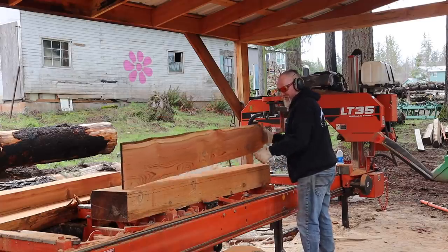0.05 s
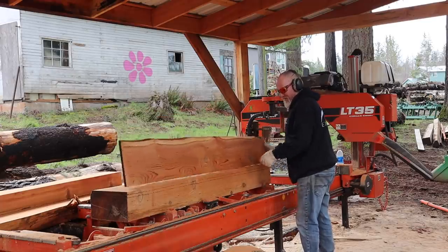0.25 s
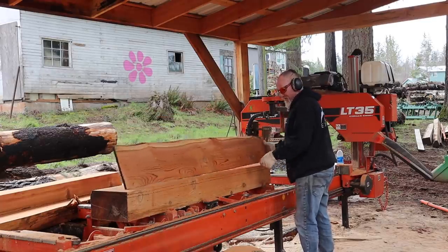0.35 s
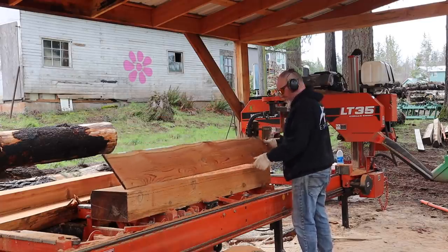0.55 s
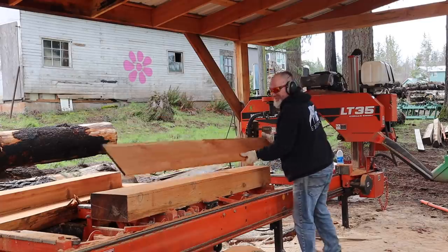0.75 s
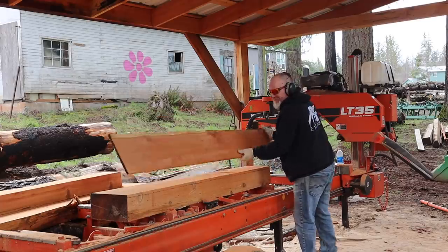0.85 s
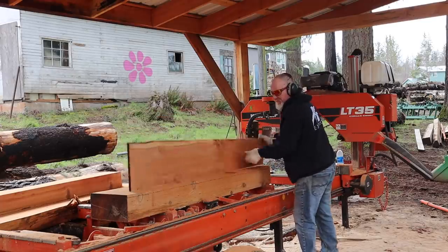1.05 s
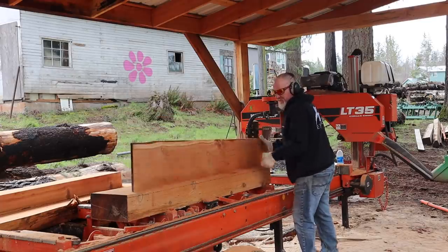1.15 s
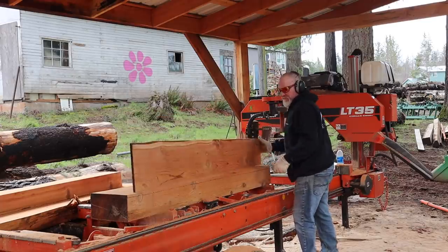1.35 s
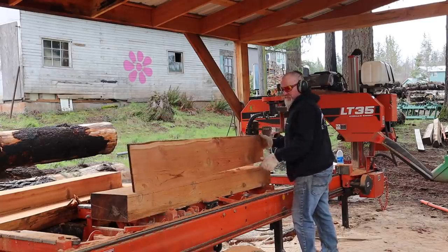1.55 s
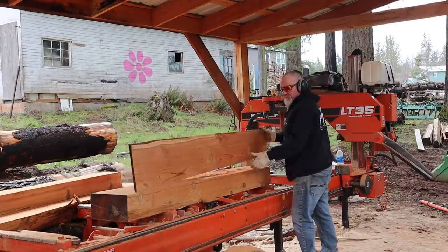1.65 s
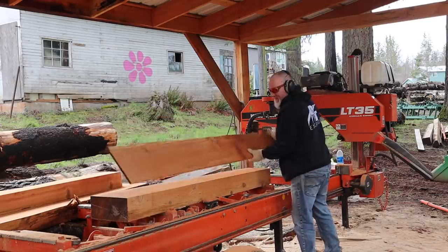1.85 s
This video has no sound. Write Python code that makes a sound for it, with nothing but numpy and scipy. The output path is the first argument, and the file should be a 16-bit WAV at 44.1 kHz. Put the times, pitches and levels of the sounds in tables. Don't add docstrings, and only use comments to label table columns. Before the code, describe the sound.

Wooden plank knocks on a sawmill bed: soft shifts at 0.1 s, a hard, full knock at 0.22 with bounces and thin steel ringing, a heavy dull thud at 0.36, faint nudges near 0.7. Wood grates around 1.05, then a sharper, shorter knock at 1.14, clinks and rattles to 1.35, low steel hum from 1.45. Dragging from 1.7 cuts at 1.83 to faint birds. Quiet yard air, distant motor, roof reverberation, clipped peaks.

```python
import sys
import numpy as np
from scipy import signal
from scipy.fft import rfft, irfft, next_fast_len
from scipy.io import wavfile
from scipy.ndimage import map_coordinates

SR = 44100
rng = np.random.default_rng(int(sys.argv[2]) if len(sys.argv) > 2 else 0)


def decibels_to_gain(level_db):
    exponent = np.asarray(level_db, float) / 20
    return 10 ** exponent


def int16_out(signal):
    q = np.round(np.clip(np.atleast_2d(signal).T, -1, 1) * 32767)
    wavfile.write(sys.argv[1], SR, q.astype(np.int16))


N = 83790
T = np.arange(N) / SR
CHANGE_S = 1.826
STEEL_RISE_S = 0.0014


def unit(x):
    return x / np.sqrt(np.mean(x ** 2) + 1e-20)


def along(points, hz):
    f, v = np.transpose(points)
    return np.interp(np.log(hz + 1), np.log(f + 1), v)


def curve(rows, outside_db=-120):
    s, db = np.transpose(rows)
    return np.interp(T, s, db, outside_db, outside_db)


def filtered(x, response):
    m = next_fast_len(len(x) + 8192)
    hz = np.fft.rfftfreq(m, 1 / SR)
    return irfft(rfft(x, m) * response(hz), m)[:len(x)]


def band(f, hz, width_hz):
    return 1j * f * width_hz / (hz * hz - f * f + 1j * f * width_hz + 1e-9)


def ring_noise(length, hz, width_hz):
    return filtered(rng.standard_normal(length), lambda f: band(f, hz, width_hz) ** 2)


def decaying_tone(t, hz, db, t60):
    return decibels_to_gain(db - 60 * t / t60) * np.sin(2 * np.pi * hz * t)


def add(out, s, x):
    part = out[round(s * SR):][:len(x)]
    part += x[:len(part)]


def wobble(rate):
    return map_coordinates(rng.standard_normal(int(N * rate / SR) + 4), [T * rate])


# frequency in Hz, t60 in seconds.
ROOF_DECAY = [(80, 1.27), (250, 0.41), (1000, 0.72), (3000, 0.58), (10000, 0.43)]


def roof():
    wall_s, wall_spread_s, wall_db, rise_s = 0.16, 0.021, 0, 0.00067
    hz, t, z = signal.stft(rng.standard_normal(SR), SR, nperseg=256)
    swell_db = wall_db * np.exp(-((t - wall_s) / wall_spread_s) ** 2)
    decay_db = -60 * t / along(ROOF_DECAY, hz)[:, None]
    tail = signal.istft(z * decibels_to_gain(swell_db + decay_db), SR, nperseg=256)[1][:SR]
    tail = tail * (1 - np.exp(-T[:SR] / rise_s))
    return tail / np.linalg.norm(tail)


# frequency in Hz, width in Hz, gain over the
# plain tail in dB.
FRAME = [(2620, 300, -6), (3400, 600, -2), (4870, 350, -4), (5480, 350, -3)]


def scatter(tone):
    def colour(f):
        frame = sum(decibels_to_gain(db) * np.abs(band(f, hz, w)) ** 2 for hz, w, db in FRAME)
        return decibels_to_gain(along(tone, f)) * (1.22 + frame)
    return filtered(roof(), colour)


def knocks(blows, modes, tone, sign=1):
    strike_s, crack_s, crack_hz, crack_width_hz = 0.00037, 0.0082, 2730, 2130
    scatter_db, ring_share_db = -1, -16
    out, t = np.zeros(N), T[:SR // 4]
    ring = sum((-1) ** k * decaying_tone(t, *mode) for k, mode in enumerate(modes))
    ring = sign * ring * (1 - np.exp(-(t / strike_s) ** 2))
    for s, ring_db, crack_db, roof_db in blows:
        splinter = rng.standard_normal(len(t)) * decibels_to_gain(-60 * t / crack_s)
        crack = filtered(splinter, lambda f: band(f, crack_hz, crack_width_hz) ** 2)
        add(out, s, decibels_to_gain(ring_db) * ring + decibels_to_gain(crack_db) * crack)
        broad = scatter(tone)
        broad = broad * np.linalg.norm(ring) / np.linalg.norm(broad)
        add(out, s, decibels_to_gain(ring_db + roof_db + scatter_db) * broad)
        add(out, s, decibels_to_gain(ring_db + roof_db + ring_share_db) * signal.fftconvolve(ring, roof()))
    return out


# frequency in Hz, level in dB, t60 in seconds.
END_MODES = [(114, -5, 0.11), (178, -4.5, 0.083), (292.6, -3, 0.055), (459, -4.5, 0.064), (638, 0.5, 0.041),
             (709, -3, 0.042), (883.5, 0.5, 0.061), (1060, -7, 0.012), (1382, -5, 0.042),
             (1559, -13.5, 0.035), (1800, -11, 0.031), (2240, -7, 0.0071), (2635, -23, 0.048)]
# start in seconds, ring in dB, crack in dB, roof in dB.
END_BLOWS = [
    (.2218, -23.5, -61, -6.5),
    (.2243, -17, -21.5, -3),
    (.2284, -27.5, -44, 1),
    (.2508, -32, -63, -3),
    (.307, -37.5, -60, 2),
]
# frequency in Hz, level in dB per Hz.
END_TAIL = [(41, -49), (70, -12), (237, 1.5), (279, -2), (342, 1), (1090, -17.5), (9000, -49), (11700, -68),
            (19800, -120)]


def end_knocks():
    return knocks(END_BLOWS, END_MODES, END_TAIL)


# frequency in Hz, level in dB, t60 in seconds.
MIDDLE_MODES = [(135, -12.5, 0.056), (204, -11.5, 0.052), (414.6, 4, 0.04), (650, -12.5, 0.05),
                (842, 3, 0.025), (972, 2, 0.018), (1304, -2.5, 0.019), (1428, 0, 0.0073),
                (1900, -13.5, 0.015), (2664, -10, 0.0083), (3415, -18.5, 0.0089)]
# start in seconds, ring in dB, crack in dB, roof in dB.
MIDDLE_BLOWS = [
    (1.1412, -34, -38, 4.5),
    (1.1429, -13, -21.5, -6.5),
    (1.1468, -25, -23, -1),
    (1.161, -29.5, -53, -4),
    (1.231, -32, -62, 2),
    (1.256, -39, -67, 10),
    (.4695, -57, -71, -19),
]
# frequency in Hz, level in dB per Hz.
MIDDLE_TAIL = [(41, -17), (70, -4.5), (223, 0), (394, -0.5), (906, -5.5), (1450, -17.5), (9000, -44.5),
               (11700, -60), (19800, -120)]


def middle_knocks():
    return knocks(MIDDLE_BLOWS, MIDDLE_MODES, MIDDLE_TAIL)


# frequency in Hz, level in dB, t60 in seconds.
FACE_MODES = [(94, -11, 0.03), (140.5, -6.5, 0.095), (208, 3, 0.023), (434, -5, 0.023), (676, -27, 0.11),
              (786, -21.5, 0.05), (1670, -34, 0.016)]
# start in seconds, ring in dB, crack in dB, roof in dB.
FACE_BLOWS = [
    (.102, -41.5, -88, 4.5),
    (.138, -54, -80, 13),
    (.3592, -12.5, -72, -6.5),
    (.381, -22.5, -62, -3),
    (.388, -25, -39, -18),
    (.64, -42.5, -113, -33),
    (.69, -52.5, -60, 9.5),
    (.715, -44.5, -80, -0.5),
]
# frequency in Hz, level in dB per Hz.
FACE_TAIL = [(41, -21), (70, 3.5), (410, -4.5), (900, -17), (1400, -43), (9000, -65), (11700, -62),
             (19800, -120)]


def face_knocks():
    return knocks(FACE_BLOWS, FACE_MODES, FACE_TAIL, sign=-0.68)


# start in seconds, level in dB, frequency in Hz, t60 in seconds.
LEANS = [(0.13, -50, 270, 0.054), (0.207, -57, 340, 0.042), (.2205, -28, 195, 0.045),
         (0.44, -34, 142, 0.098), (.31, -44, 1230, 0.027), (1.262, -36, 243, .08), (.4695, -46, 850, 0.044),
         (.369, -38, 1020, 0.03), (.40, -35, 620, 0.053), (1.075, -49, 274, .06)]


def leans():
    out, t = np.zeros(N), T[:SR // 4]
    for s, db, hz, t60 in LEANS:
        add(out, s, decaying_tone(t, hz, db, t60) * (1 - np.exp(-t / STEEL_RISE_S)))
    return out


# frequency in Hz, width in Hz, level in dB.
GRAIN = [(1760, 360, -3.5), (2280, 620, -0.5), (3270, 770, 10.5), (5110, 320, -3)]


def slide(rows, tone):
    grit_rate, grit_db = 5900, 1.5

    def colour(f):
        grain = sum(decibels_to_gain(db) * np.abs(band(f, hz, w)) ** 2 for hz, w, db in GRAIN)
        return decibels_to_gain(along(tone, f)) * (.5 + grain)
    struck = rng.random(N) < grit_rate / SR
    grit = struck * rng.standard_normal(N) * decibels_to_gain(grit_db * rng.exponential(size=N))
    rub = unit(filtered(unit(grit) + 2.7 * rng.standard_normal(N), colour))
    return decibels_to_gain(curve(rows) + 1.43 + 0.87 * wobble(59.76)) * rub


# time in seconds, level in dB.
LIFT = [(.9, -75), (.94, -66.5), (.975, -67), (1.0, -57.5), (1.048, -48.5), (1.075, -53), (1.09, -64),
        (1.115, -59.5), (1.14, -57.5)]
# frequency in Hz, level in dB per Hz.
LIFT_TONE = [(240, -35), (400, -1.5), (574, 2.5), (677, 4.5), (1060, 1), (1670, -2.5), (3200, -15.5),
             (5130, -14), (11000, -22.5), (14300, -63), (22000, -120)]


def lift():
    return slide(LIFT, LIFT_TONE)


# time in seconds, level in dB.
DRAG = [(1.6, -78), (1.69, -64.5), (1.727, -60), (1.737, -53.5), (1.77, -55), (1.8, -52.5), (1.826, -49.5)]
# frequency in Hz, level in dB per Hz.
DRAG_TONE = [(240, -4), (400, 7.5), (870, 9.5), (1150, -4), (1540, 3.5), (2260, -3.5), (2790, -12),
             (3070, -9.5), (11000, -15), (14300, -86), (22000, -120)]


def drag():
    return slide(DRAG, DRAG_TONE)


# start in seconds, level in dB, t60 in seconds, centre in Hz.
RATTLES = [(.232, -53.5, 0.65, 3070), (0.251, -61, 0.33, 5370), (0.311, -64, 0.14, 6500),
           (0.363, -53, 0.088, 1900), (0.402, -63, 0.087, 4620), (1.151, -77, 0.2, 4380),
           (1.201, -60.5, 0.12, 8200), (1.275, -63, 0.047, 6750), (1.3273, -67, 0.088, 7500),
           (1.329, -53, 0.066, 5230), (1.339, -55.5, 0.18, 2570), (1.4962, -61, 0.045, 3240),
           (1.6798, -58, 0.052, 3930), (.268, -65, 0.24, 9800), (1.159, -60.5, .1, 7760),
           (1.35, -65, .12, 5140), (0.354, -64, .12, 5170), (1.03, -60, 0.18, 5000)]


def rattles():
    out, t = np.zeros(N), T[:SR // 2]
    for s, db, t60, hz in RATTLES:
        burst = unit(ring_noise(len(t), hz, hz / 3.8))
        add(out, s, decibels_to_gain(db - 60 * t / t60) * (1 - np.exp(-t / STEEL_RISE_S)) * burst)
    add(out, 1.6525, decaying_tone(t, 5800, -49, .0015))
    return out


# frequency in Hz, level in dB, t60 in seconds.
PIN = [(9147, -52, .24), (9190, -53.5, .24), (9292, -63, .15)]


def pin():
    out, t = np.zeros(N), T[:SR // 2]
    song = sum(decaying_tone(t, *mode) for mode in PIN)
    add(out, .252, song * (1 - np.exp(-t / STEEL_RISE_S)))
    return out


# time in seconds, level in dB.
BED_SWELL = [(.0, -69), (1.3, -96), (1.45, -50.5), (1.5, -57), (1.55, -53.5), (1.63, -56.5), (1.72, -60.5),
             (1.9, -73)]
# frequency in Hz, width in Hz, level in dB.
BED = [(447, 40, 1.5), (717, 88, 2), (1010, 510, -11), (1930, 170, -24), (2570, 430, -21)]


def bed():
    hum = filtered(rng.standard_normal(N), lambda f: sum(decibels_to_gain(db) * band(f, hz, w) ** 2 for hz, w, db in BED))
    return decibels_to_gain(curve(BED_SWELL)) * unit(hum)


# start in seconds, level in dB, t60 in seconds, ring over hiss in dB.
CLINKS = [(.2508, -58, 0.023, -4), (0.3107, -53.5, 0.055, -1.5), (0.3677, -65, 0.035, 3),
          (.413, -68.5, 0.033, 4), (1.1516, -43, 0.022, -7), (1.201, -70, 0.042, -8),
          (1.217, -60, 0.043, 5.5), (1.272, -62, 0.038, 3), (1.3261, -54, 0.054, -4.5),
          (1.335, -60, 0.054, 1.5)]
# frequency in Hz, level in dB, t60 in seconds.
CLINK_MODES = [(3560, 4.5, 0.075), (4840, -4.5, 0.068), (5480, -3, .07), (6500, -19.5, 0.044),
               (8400, -8, 0.037)]


def clinks():
    out, t = np.zeros(N), T[:SR // 4]
    for s, db, t60, ring_db in CLINKS:
        hiss = unit(ring_noise(len(t), 7040, 5300)) * decibels_to_gain(-60 * t / t60)
        ring = sum(decaying_tone(t, hz, level + rng.normal(0, 3.3), life) for hz, level, life in CLINK_MODES)
        add(out, s, decibels_to_gain(db) * (hiss + decibels_to_gain(ring_db) * ring) * (1 - np.exp(-t / 0.0011)))
    return out


# start in seconds, length in seconds, pitch in Hz, level in dB.
BIRDS = [(1.826, .018, 5250, -67), (1.843, .018, 5150, -63), (1.858, .02, 5750, -66),
         (1.863, .016, 5100, -64), (1.878, .022, 5200, -66), (1.877, .022, 4700, -70),
         (1.884, .016, 3500, -69)]


def birds():
    out = np.zeros(N)
    for s, length, hz, db in BIRDS:
        t = T[:round(length * SR)]
        note = unit(ring_noise(SR // 8, hz, 300))[-len(t):]
        add(out, s, decibels_to_gain(db) * np.abs(np.sin(np.pi * t / length)) ** 0.15 * note)
    return out


# time in seconds, level in dB.
HUM_LOAD = [(0, 1), (.15, 7), (.6, -1), (.8, -3.5), (1.0, 7), (1.15, -17), (1.5, 10.5), (1.65, 8),
            (1.83, -4)]


def motor():
    hum_hz, hum_width_hz, hum_db = 121, 16, -61
    hum = unit(ring_noise(N, hum_hz, hum_width_hz))
    return decibels_to_gain(hum_db + curve(HUM_LOAD) + 1.5 * wobble(12)) * hum


# frequency in Hz, level in dB per Hz.
YARD = [(25, 5.5), (120, -4), (300, -9), (550, -20), (950, -14.5), (1700, -26.5), (3200, -31),
        (10500, -38.5)]
# time in seconds, level in dB.
AIR_SWELL = [(0, -.5), (1.826, -.5), (1.827, 1.5), (1.9, 1.5)]


def air():
    gust_hz, gust_db = 470, 1
    hiss = unit(filtered(rng.standard_normal(N), lambda f: decibels_to_gain(along(YARD, f))))
    low = filtered(hiss, lambda f: 1 / (1 + (f / gust_hz) ** 2))
    moving = hiss + (decibels_to_gain(gust_db * wobble(7.43)) - 1) * low
    return decibels_to_gain(-53.5 + curve(AIR_SWELL)) * moving


def scene():
    work = end_knocks() + middle_knocks() + face_knocks()
    work = work + lift() + drag()
    work = work + rattles() + pin() + bed()
    small = leans() + clinks()
    return (work * (T < CHANGE_S) + small + birds() + motor() + air())[None]


def low_pass(x):
    return signal.sosfilt(signal.butter(12, 11460, fs=SR, output="sos"), x)


def record(dry):
    low_hz, top_hz, clip_top, clip_hard = 38.8, 10900, .212, 8
    thin = filtered(dry[0], lambda f: (1j * f / (1j * f + low_hz)) ** 2)
    clipped = thin / (1 + np.abs(thin / clip_top) ** clip_hard) ** (1 / clip_hard)
    dull = filtered(clipped, lambda f: (f < 11450) / (1 + (f / top_hz) ** 8))
    return low_pass(dull[None])


dry = scene()
out = record(dry)
int16_out(out)
```